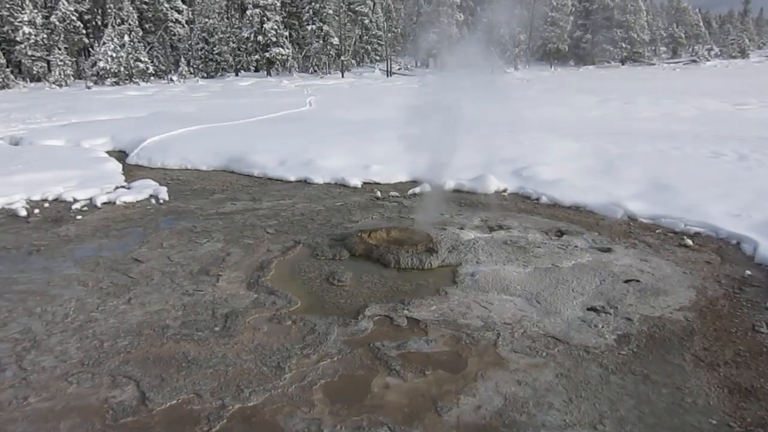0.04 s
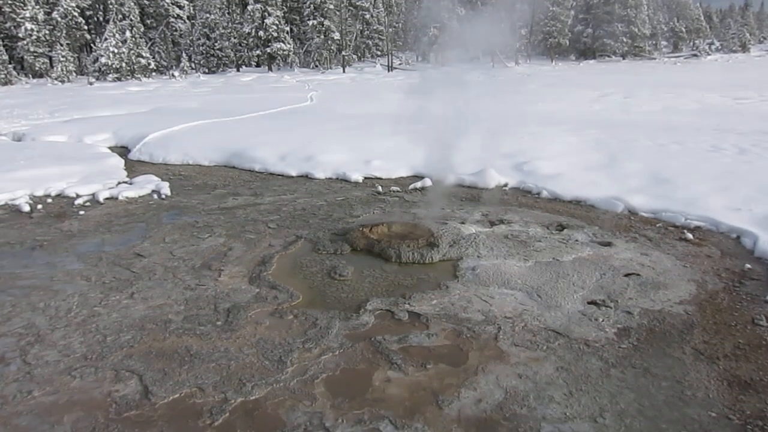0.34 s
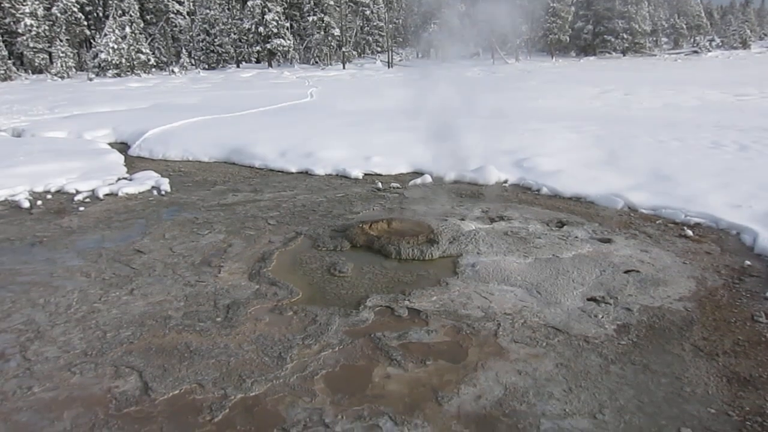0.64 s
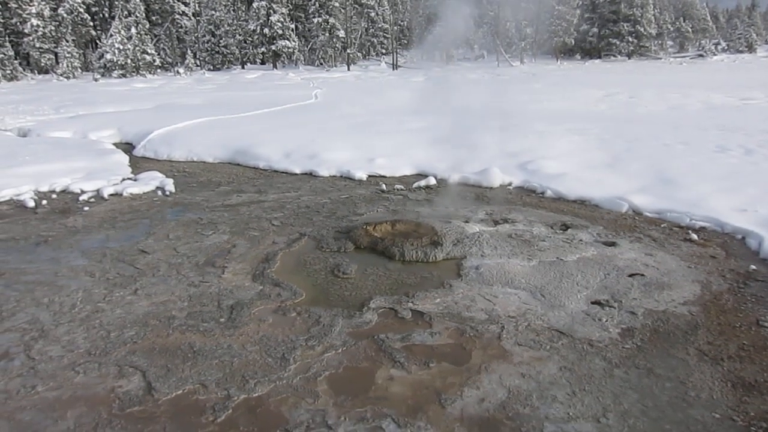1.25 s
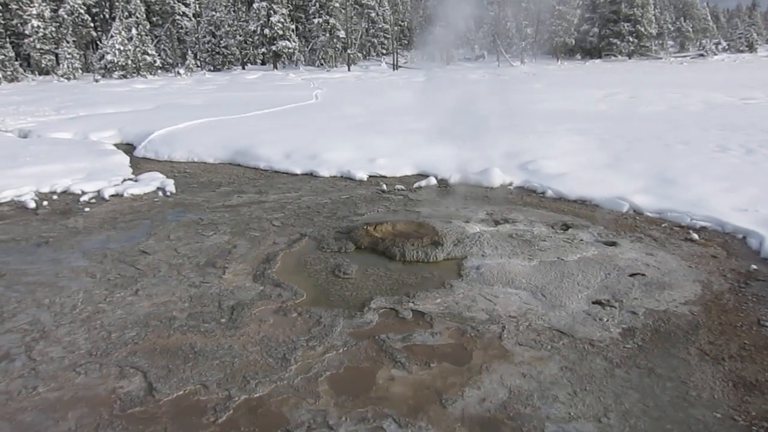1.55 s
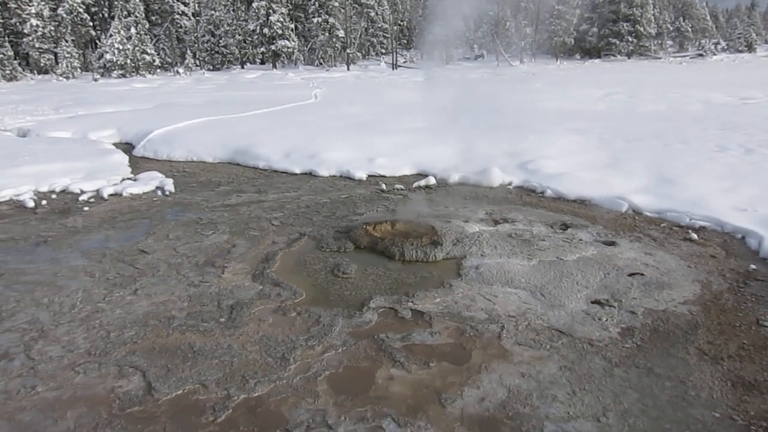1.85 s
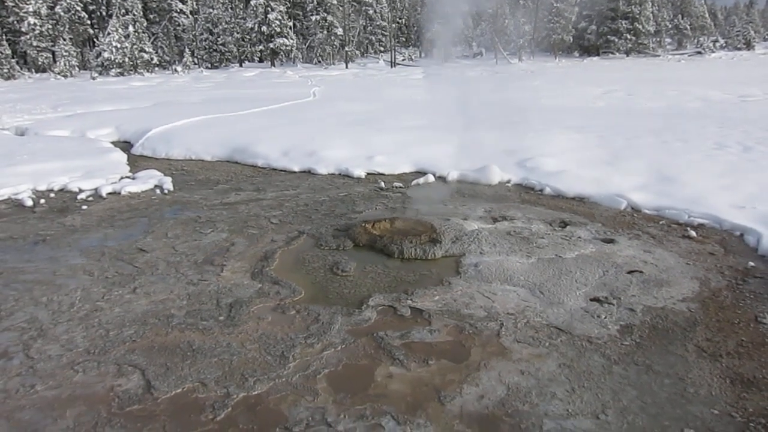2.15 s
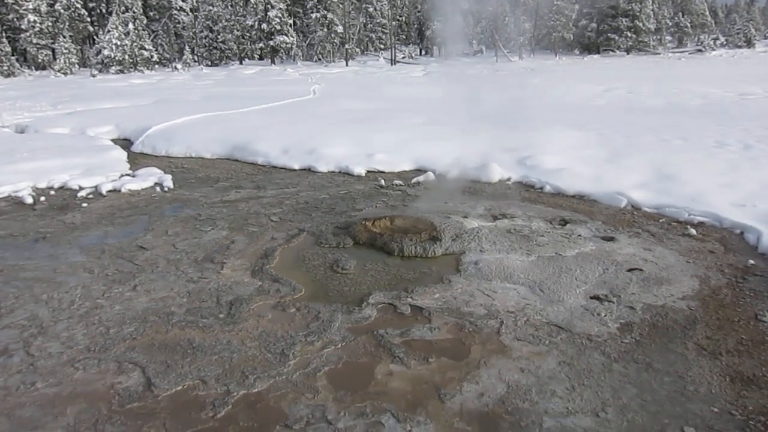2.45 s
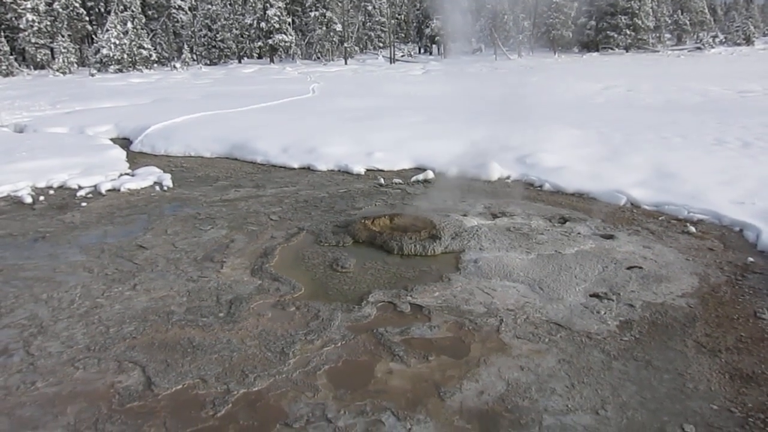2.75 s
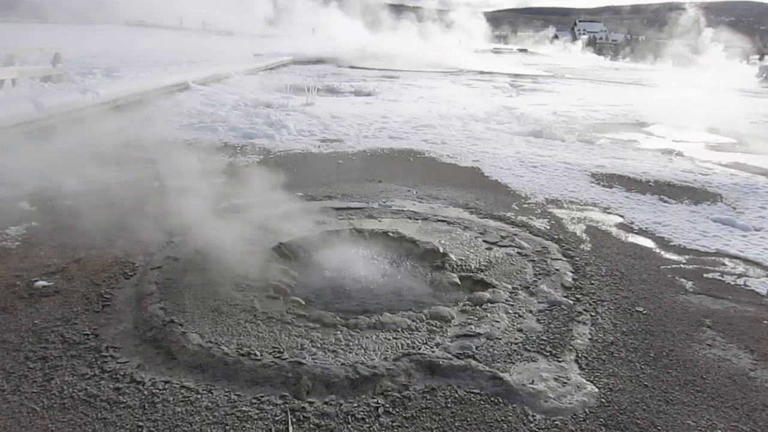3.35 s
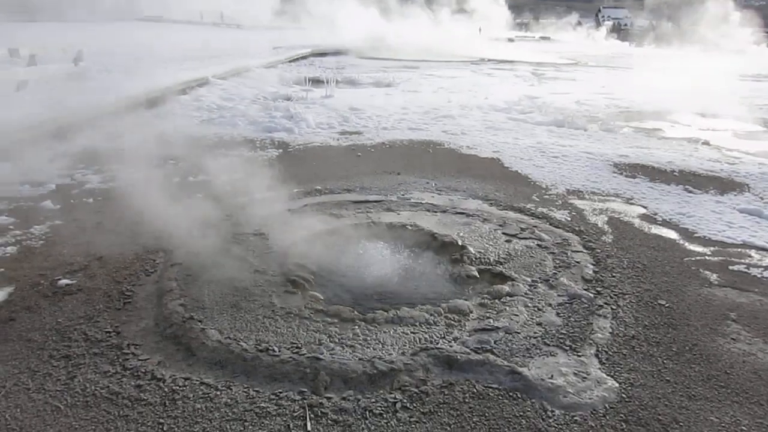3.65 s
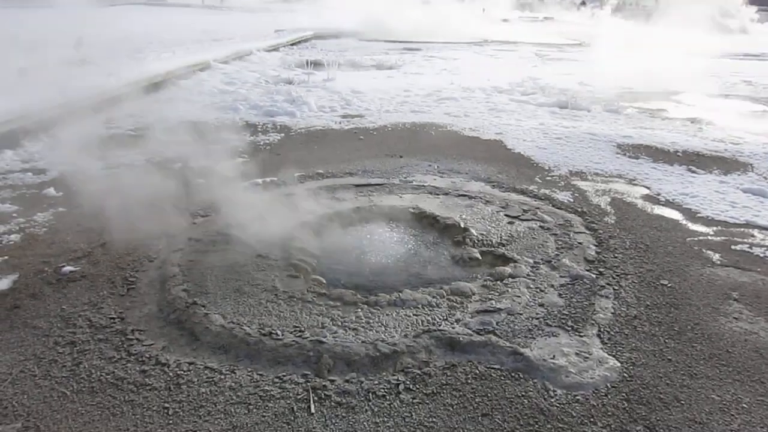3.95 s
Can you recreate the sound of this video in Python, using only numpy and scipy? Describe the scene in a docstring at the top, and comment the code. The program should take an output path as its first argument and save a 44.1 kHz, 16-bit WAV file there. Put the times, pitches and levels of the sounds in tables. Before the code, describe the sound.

A hot spring boils outdoors with wet plops, deep glugs and fine fizz over a steady rush of steam. Two knocks bump the microphone early on. After a brief silence, a shallower pool simmers in gusty wind.

```python
"""Wet plops and deep glugs come from a hot spring boiling in its crater, each bubble ringing as a
short rising tone. Tiny bubbles fizz, spray spatters and drops tick down over hissing steam, a wide
rush and a thin whine. After a short silence a second, shallower pool simmers and splashes while
wind buffets the microphone. Twice a jet of steam swells through a vent; three knocks ring the
camera body, the first two with a hollow pop and a crack."""
import sys
import numpy as np
from scipy import signal
from scipy.fft import rfft, irfft
from scipy.io import wavfile

SR = 44100
rng = np.random.default_rng(int(sys.argv[2]) if len(sys.argv) > 2 else 0)


def materialize(psi):
    """Save the field psi as 16-bit PCM at rate SR to the path in sys.argv[1].

    A 1-D psi becomes a single channel; in a 2-D psi each row is a channel.
    """
    bounded = np.clip(np.atleast_2d(psi).T, -1, 1)
    quanta = np.round(bounded * 32767).astype(np.int16)
    wavfile.write(sys.argv[1], SR, quanta)


N = 176400
T, HZ = np.arange(N) / SR, np.fft.rfftfreq(N, 1 / SR)
FIRST_END_S, SECOND_START_S = 3.05, 3.182
FIRST_POOL = T < FIRST_END_S
OPPOSED = np.array([[1.], [-1.]])  # left and right in opposite phase


# Short midrange pops: bursting bubbles, and at 0.056 and 0.292 s the hollow body of two camera knocks
# (time [s], level [dB], pitch [Hz], cluster length [s], cluster against main tone [dB])
POPS = [(0.056,-25,900,0.011,-3.5),(.061,-24,450,.015,-24),(.150,-35.5,1140,0.011,-1.5),(.159,-28.5,504,0.013,-2.5),(.176,-31,586,0.029,-4.5),(.208,-37.5,1370,0.0066,-7),(.292,-30,585,0.011,-3.5),
        (0.456,-25.5,875,0.0072,-23),(.556,-38.5,418,0.027,0.5),(.580,-31,550,0.015,-1.5),(0.606,-27.5,1600,.006,-16),
        (.865,-37,402,.008,-10),(0.894,-31,450,0.015,-5),(0.917,-33.5,490,0.031,-3),(1.250,-28.5,510,0.019,-9.5),
        (1.315,-22.5,507,0.016,-11.5),(1.376,-35.5,634,0.0058,-0.5),(1.426,-30,454,0.013,-15),
        (1.704,-17.5,550,0.02,-11.5),(1.996,-26,790,0.0078,-20),(2.025,-23,460,0.011,-3),(2.039,-26.5,920,0.014,-27),(2.081,-27,398,0.024,-14),
        (2.265,-38.5,514,0.019,6),(2.425,-36.5,396,.015,4.5),(2.547,-26.5,487,.015,-12),
        (2.576,-29.5,885,0.021,-6.5),(2.682,-30.5,772,.015,-5),(2.711,-22,506,0.013,-16.5),(2.985,-33.5,986,0.03,-5.5),(3.010,-35.5,483,0.019,-0.5),
        (3.185,-35,1200,0.0049,-9),(3.499,-39.5,1570,0.0091,3),(3.577,-34.5,810,0.023,1),(3.592,-26.5,800,0.024,-6.5),(3.688,-38.5,1920,.009,2.5),
        (3.706,-31.5,2070,0.012,-2),(3.725,-30,2280,0.016,-4.5),(3.748,-30,2220,0.02,-7.5),(3.783,-36.5,1100,0.0064,-1.5)]
def pops():
    """A damped tone in a cluster of higher and lower ones: a bubble and its churn, or a hollow knock."""
    out = np.zeros((2, N))
    grains_per_s, lead_s = 1800, .003
    for s, db, hz, length, cluster_db in POPS:
        pop = np.zeros((2, SR // 5))
        for when, size, mid, side in rng.standard_normal((int(grains_per_s * length) + 4, 4)):
            octaves = np.clip(size * 0.44, -1, 2)
            grain = bubble(hz * 2 ** octaves, cycles=1.06, rise=0.044) * amp(-0.5 * octaves)
            add(pop, abs(when * length * .6 + lead_s), (mid + 0.18 * side * OPPOSED) * grain)
        pop *= amp(cluster_db) * np.sqrt(length * SR / (pop ** 2).sum())
        add(pop, lead_s, 0.84 * bubble(hz, cycles=1.6, rise=0.044))  # the main tone
        add(out, s - lead_s, amp(db - 4) * pop)
    return out


# Deep glugs (time [s], level [dB], pitch [Hz])
GLUGS = [(1.252,-38.5,190),(1.557,-37.5,212),(1.728,-35,212),(1.754,-30,207),(1.805,-28,214),(1.979,-28.5,225),(2.015,-34,208),(2.088,-30,212),
         (2.216,-31,210),(2.249,-34.5,205),(2.341,-36,210),(2.477,-32,179),(2.536,-31,220),(2.64,-32.5,197),(2.664,-29.5,202),(2.743,-37,162),(2.971,-29,180)]
def glugs():
    """Large steam pockets collapse in the throat, each a low tone with a soft attack."""
    out = np.zeros(N)
    for s, db, hz in GLUGS:
        add(out, s, amp(db - 0.5) * bubble(hz, cycles=1.35, rise=0.018, onset=0.79))
    return out


# Vigour of the boil (time [s], deep gurgle level [dB], surface bubbling level [dB])
BOIL_LEVELS = [(0,-41,-45.5),(.12,-48,-52),(.6,-49,-50.5),(.8,-48.5,-60),(.95,-52.5,-52.5),(1.1,-53.5,-63),(1.45,-54.5,-53),(1.64,-51.5,-53),(1.75,-43,-46),(1.9,-46.5,-54),(2.05,-36.5,-39.5),(2.14,-43.5,-47.5),(2.25,-43.5,-41.5),(2.38,-44,-48.5),(2.67,-42.5,-47.5),(2.88,-45.5,-48),(3.04,-41.5,-47.5)]
# Tone of the deep gurgle and of the surface bubbling (frequency [Hz], level [dB])
GURGLE_EQ = [(80,-11.5),(150,-5.5),(215,1.5),(265,-1.5),(340,-9.5)]
SURFACE_EQ = [(300,-2.5),(440,0.5),(620,-7.5),(850,-2.5),(1100,-9.5),(1700,-12),(3400,-13.5)]
def boil():
    """The first pool surges: big bubbles gurgle below, smaller ones chirp on top."""
    gurgle = swarm(GURGLE_EQ, per_s=600, cycles=1.3, spread_db=1.5, rise=0.031)
    surface = swarm(SURFACE_EQ, per_s=800, cycles=1.77, spread_db=2.5, rise=0.11)
    return fader(BOIL_LEVELS, column=1) * gurgle + fader(BOIL_LEVELS, column=2) * surface


# Tone of the shallow pool (frequency [Hz], level [dB])
SIMMER_EQ = [(300,-16),(500,1),(800,0.5),(1400,-5),(2400,-7.5),(3400,-38)]
def simmer():
    """The second pool keeps up an even patter of midrange bubbles."""
    return amp(-54) * swarm(SIMMER_EQ, per_s=1100, cycles=1.34, spread_db=0, rise=0.062)


# Resonances of the basin (frequency [Hz], level [dB])
BASIN_EQ = [(70,-8.5),(135,1),(218,2.5),(320,-4.5),(440,1.5),(610,-1),(840,0.5),(1100,-1),(2450,1),(3300,-13.5)]
def pools():
    """The basin colours pops and bubbling; the first pool sits a little right, the second left."""
    mix = pops() + glugs() + np.where(FIRST_POOL, boil(), simmer())
    pan_db = np.where(FIRST_POOL, -2, 1)
    return irfft(rfft(mix) * eq_gain(BASIN_EQ, HZ), N) * amp(OPPOSED * pan_db)


# Swells of the fizz (time [s], level [dB])
FIZZ_LEVELS = [(0,-63.5),(.6,-64),(.8,-66.5),(.97,-64),(1.15,-74),(1.3,-63),(1.48,-72),(1.74,-63),(1.85,-64.5),(2.04,-61),(2.15,-63.5),(2.25,-59.5),(2.38,-65.5),(2.62,-61.5),(2.8,-67),(3.02,-60),(3.2,-62.5),(3.37,-71),(3.48,-63),(3.75,-66),(4,-87)]
# Tone of the fizz (frequency [Hz], level [dB])
FIZZ_EQ = [(2500,-1.5),(3600,-1),(8000,-2),(12000,-4),(15000,-7.5)]
def fizz():
    """Thousands of tiny bubbles a second blur into a fine sizzle."""
    return fader(FIZZ_LEVELS) * swarm(FIZZ_EQ, per_s=4000, cycles=3.7, spread_db=2.5, rise=0.012)


# Sharp crackles: the crack of the first two camera knocks, then volleys of spray
# (time [s], level [dB], length [s])
CRACKLES = [(0.053,-47.5,0.0091),(0.289,-49,0.01),(2.224,-51,0.0038),(2.256,-51.5,0.0059),(2.317,-47,0.0034),(3.484,-55,0.0024)]
# Tone of one click (frequency [Hz], level [dB])
CLICK_EQ = [(1200,-5),(2800,2),(5500,-4),(8500,-9),(14000,-28)]
def crackles(clicks_per_s=1800):
    """Short volleys of sharp clicks thin out: the crack of a knock, or spray hitting wet rock."""
    out, click = np.zeros(N), ring(CLICK_EQ)
    for s, db, length in CRACKLES:
        volley = np.zeros(SR // 8)
        for when, size in rng.standard_normal((int(clicks_per_s * length) + 2, 2)):
            add(volley, abs(when) * length, size * click)
        add(out, s, amp(db) * np.sqrt(length * SR) * volley / np.linalg.norm(volley))
    return out


# Flying drops landing (time [s], level [dB], pitch [Hz])
DROPS = [(.0875,-31,11400),(.149,-46,11600),(.2465,-41,13000),(.693,-48,9600),(2.894,-45.5,11760)]
def drops(splash_decay_s=0.0037):
    """Single drops land close by, each a high tick with a tiny noisy splash."""
    out, t = np.zeros(N), np.arange(SR // 30) / SR
    for s, db, hz in DROPS:
        add(out, s, amp(db) * bubble(hz, cycles=4.1, rise=.004, onset=3.3))
        resonance = bubble(hz, cycles=2.05, rise=0, onset=.5)
        splash = signal.fftconvolve(rng.standard_normal(len(t)), resonance)[:len(t)]
        add(out, s, amp(db) * 0.25 * unit(splash) * np.exp(-t / splash_decay_s))
    return out


# Steam jets (peak time [s], level [dB], attack [s], vent pitch [Hz])
JETS = [(1.715,-54,0.21,2490),(3.465,-66,0.046,6250)]
# Resonances of a vent (frequency [multiple of vent pitch], level [dB])
VENT_EQ = [(.55,-4),(1,5),(1.22,-5),(1.55,-19.5),(1.98,-3),(2.35,-20),(6,-42)]
def jets(release_s=0.05):
    """Steam swells through the two resonances of a narrow vent, which then shuts."""
    out = np.zeros(N)
    for s, db, attack_s, hz in JETS:
        swell = np.exp(-((T - s) / np.where(T < s, attack_s, release_s)) ** 2)
        out += amp(db) * swell * noise([(ratio * hz, gain_db) for ratio, gain_db in VENT_EQ])
    return out


# Handling knocks (time [s], level [dB], rattle length [s], mid against side [ratio])
KNOCKS = [(.054,-23.5,0.01,0.55),(.289,-23,0.0096,0.39),(3.925,-23.5,0.0018,0.26)]
# Ring of the case under a rattle and under a short, hard tick (frequency [Hz], level [dB])
CASE_RATTLE_EQ = [(600,-21.5),(1150,-0.5),(1420,-0.5),(1560,3.5),(1720,3),(2080,-12),(2600,-16.5),(3400,-32),(6000,-36),(15000,-42)]
CASE_TICK_EQ = [(200,-29),(1050,-18),(1650,-1),(2900,3),(4900,-14),(6100,-38)]
def knocks():
    """Knocks ring the camera case and shake the two capsules mostly against each other."""
    out, t = np.zeros((2, N)), np.arange(SR // 15) / SR
    for s, db, length, mid_share in KNOCKS:
        body = ring(CASE_RATTLE_EQ if length > .006 else CASE_TICK_EQ)
        envelope = np.exp(-(t / length) ** 2) + 0.18 * np.exp(-t / length / 2.4)
        rattle = rng.standard_normal((2, len(t))) * envelope
        ringing = signal.fftconvolve(rattle, body[None], axes=1)
        side, mid = [x / np.linalg.norm(x) * np.sqrt(length * SR / 2) for x in ringing]
        add(out, s, amp(db) * (OPPOSED * side + mid_share * mid))
    return out


# Gusts (time [s], level [dB])
GUST_LEVELS = [(3.18,-45),(3.37,-30.5),(3.46,-39),(3.59,-32.5),(3.72,-40.5),(3.9,-33),(3.97,-49)]
# Tone of the buffeting (frequency [Hz], level [dB])
BUFFET_EQ = [(15,-38),(35,-11),(70,1),(130,-2),(300,-19),(4000,-86)]
# Thumps of single eddies (time [s], level [dB])
THUMPS = [(3.328,-17),(3.379,-18),(3.849,-23)]
def wind():
    """At the second pool, gusts rumble on the microphone and eddies thump it."""
    buffets = fader(GUST_LEVELS) * noise(BUFFET_EQ)
    for s, db in THUMPS:
        add(buffets, s, amp(db) * bubble(hz=126, cycles=0.34, rise=0, onset=.5))
    return OPPOSED * buffets * ~FIRST_POOL


# Tone of the steam over each pool (frequency [Hz], level [dB])
FIRST_STEAM_EQ = [(20,-30.5),(40,-12.5),(90,3.5),(200,2.5),(330,-6.5),(500,-2.5),(800,-9),(1500,-9),(2400,-16),(3600,-26),(12000,-29),(16000,-35)]
SECOND_STEAM_EQ = [(20,-23),(35,-1),(120,3),(220,-1.5),(350,-7),(800,-20.5),(1500,-13.5),(2400,-18),(3800,-27.5),(7000,-25.5),(12000,-30),(16000,-41)]
def steam():
    """Steam gives a steady, dark hiss in the centre."""
    return np.where(FIRST_POOL, amp(-51) * noise(FIRST_STEAM_EQ), amp(-50.5) * noise(SECOND_STEAM_EQ))


# Tone of the bed under each pool (frequency [Hz], level [dB])
FIRST_RUSH_EQ = [(18,-51),(30,-23),(60,-4),(124,-1),(300,-3.5),(500,-7),(800,-11.5),(1280,-13.5),(1450,-18),(2250,-25.5),(3500,-42),(7000,-48),(13000,-44.5),(16000,-49.5)]
SECOND_RUSH_EQ = [(30,0),(400,-2.5),(800,-8),(1200,-8),(2500,-22),(6000,-43),(12000,-35),(16000,-39)]
def rush(whine_hz=1202, whine_width_hz=9):
    """A steady wide rush carries a thin whine of narrow-band noise; both are softer at the second pool."""
    resonance = 1 / (1 + ((HZ - whine_hz) / whine_width_hz) ** 2)
    whine = unit(irfft(rfft(rng.standard_normal(N)) * resonance, N))
    first = amp(-39) * noise(FIRST_RUSH_EQ) + amp(-55) * whine
    second = amp(-47.5) * noise(SECOND_RUSH_EQ) + amp(-66) * whine
    return OPPOSED * np.where(FIRST_POOL, first, second)


def crater(x, decay_s=0.019, wet_db=-7):
    """The rim adds brief scattered reflections, different at each ear."""
    t = np.arange(SR // 8) / SR
    echoes = rng.standard_normal((2, len(t))) * (rng.random((2, len(t))) < .05)
    tail = echoes * np.exp(-t / decay_s) * (t > .002)
    tail /= np.linalg.norm(tail, axis=1, keepdims=True)
    return x + amp(wet_db) * signal.fftconvolve(x, tail, axes=1)[:, :N]


def bubble(hz, cycles, rise, onset=0.27):
    """A damped tone that can rise like a surfacing bubble; decay and onset count in cycles, peak 1."""
    turns = np.arange(int(7 * cycles * SR / hz) + 8) * hz / SR
    envelope = (1 - np.exp(-turns / onset)) * np.exp(-turns / cycles)
    tone = envelope * np.sin(2 * np.pi * turns * (1 + rise * turns / cycles / 2))
    return tone / abs(tone).max()


def swarm(eq, per_s, cycles, spread_db, rise, pitches=36):
    """Bubbles of many sizes ring at random moments; spread_db makes a few stand out."""
    out = np.zeros(N)
    for hz in np.geomspace(eq[0][0], eq[-1][0], pitches):
        when, size, sign = rng.random((3, int(per_s * N / SR / pitches) + 1))
        accent_db = spread_db * np.minimum(-np.log(1 - size), 3)
        hits = np.zeros(N)
        hits[(when * N).astype(int)] = np.sign(sign - .5) * amp(accent_db)
        grain = bubble(hz, cycles, rise)
        out += eq_gain(eq, hz) * signal.oaconvolve(hits, unit(grain) / np.sqrt(len(grain)))[:N]
    return unit(out)


def noise(eq):
    """Steady noise shaped by an EQ curve, rms 1."""
    return unit(irfft(rfft(rng.standard_normal(N)) * eq_gain(eq, HZ), N))


def ring(eq, size=2048):
    """Minimum-phase impulse response of an EQ curve, energy 1."""
    log_gain = np.log(eq_gain(eq, abs(np.fft.fftfreq(size, 1 / SR))))
    response = np.fft.ifft(np.exp(np.conj(signal.hilbert(log_gain)))).real[:size // 2]
    return response / np.linalg.norm(response)


def eq_gain(eq, hz):
    """Gain of an EQ curve at the given frequencies."""
    points_hz, db = np.transpose(eq)
    return amp(np.interp(np.log(hz + 1), np.log(points_hz + 1), db))


def fader(table, column=1):
    """Gain over time from one column of levels."""
    rows = np.array(table)
    return amp(np.interp(T, rows[:, 0], rows[:, column]))


def amp(db):
    """Decibels to gain."""
    return 10 ** (np.asarray(db) / 20)


def unit(x):
    """Scales to rms 1."""
    return x / np.sqrt(np.mean(x ** 2) + 1e-20)


def add(mix, s, sound):
    """Mixes a sound in at s seconds."""
    part = mix[..., max(round(s * SR), 0):][..., :sound.shape[-1]]
    part += sound[..., :part.shape[-1]]


def scene():
    """Pops, bubbling, fizz and crackles echo in the crater; everything else stays dry."""
    echoing = crater(pools() + fizz() + crackles())
    return echoing + drops() + jets() + knocks() + wind() + steam() + rush()


def record(dry, cutoff_hz=15850):
    """Mutes the gap between the two pools, then cuts the top treble."""
    audible = FIRST_POOL | (T > SECOND_START_S)
    lowpass = signal.firwin(511, cutoff_hz, window=("kaiser", 9), fs=SR)
    return signal.oaconvolve(dry * audible, lowpass[None], "same")


dry = scene()
out = record(dry)
materialize(out)
```